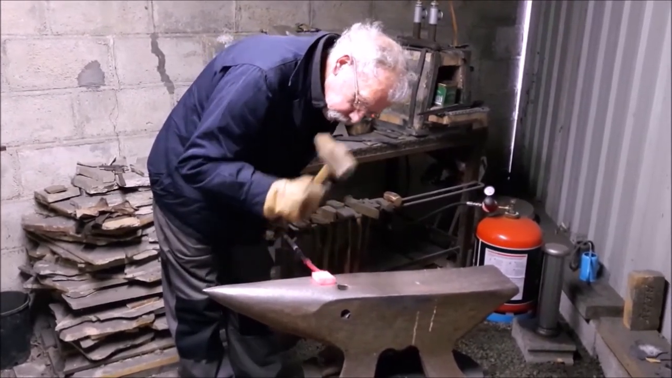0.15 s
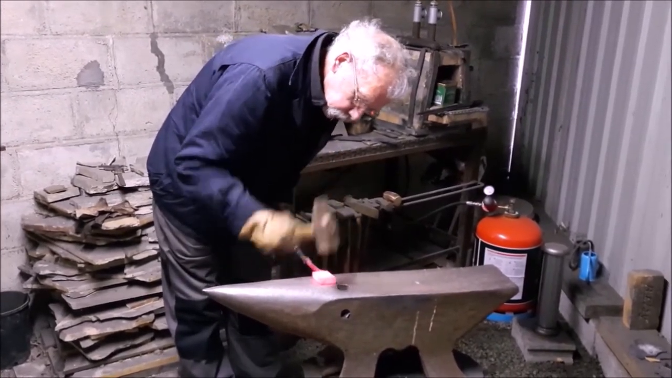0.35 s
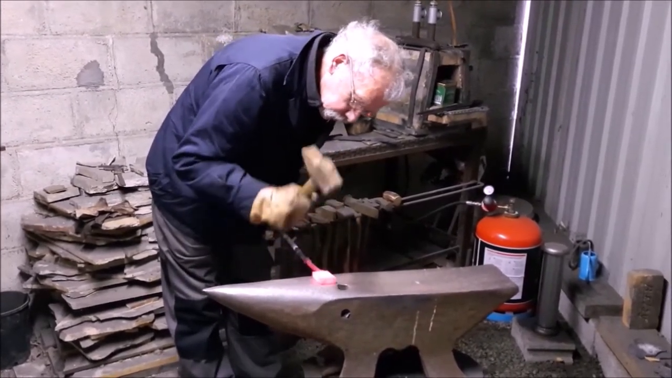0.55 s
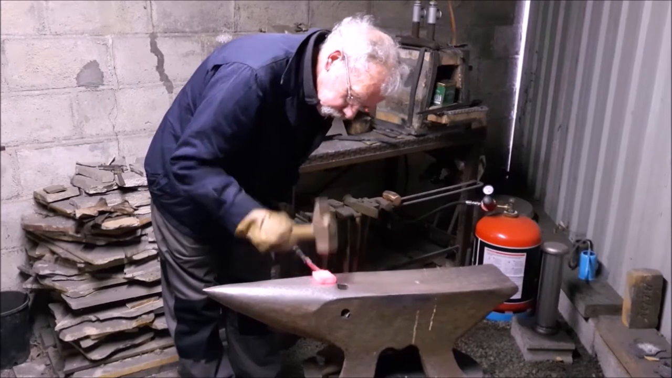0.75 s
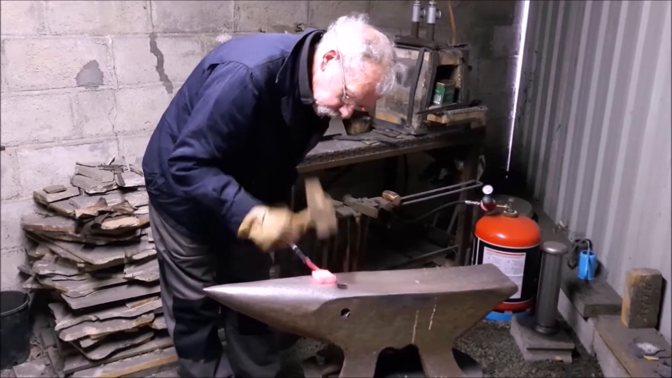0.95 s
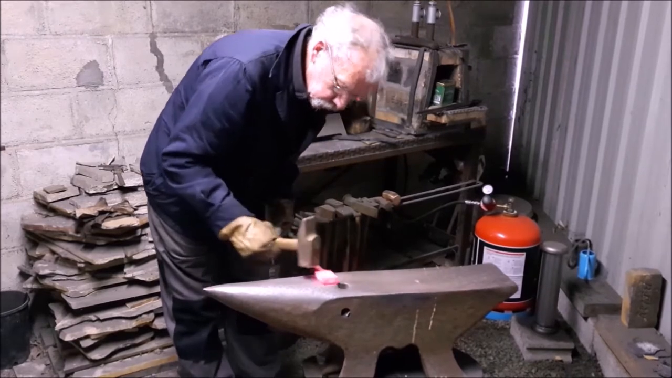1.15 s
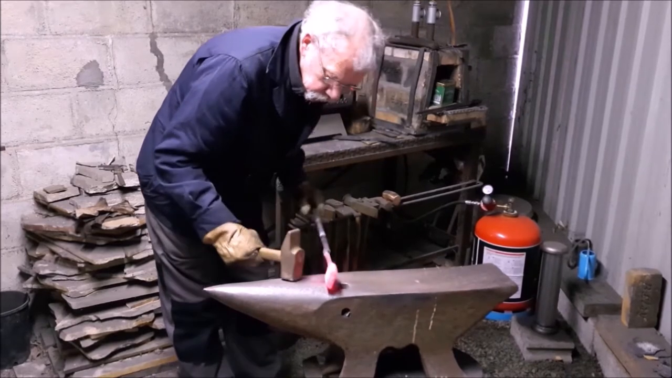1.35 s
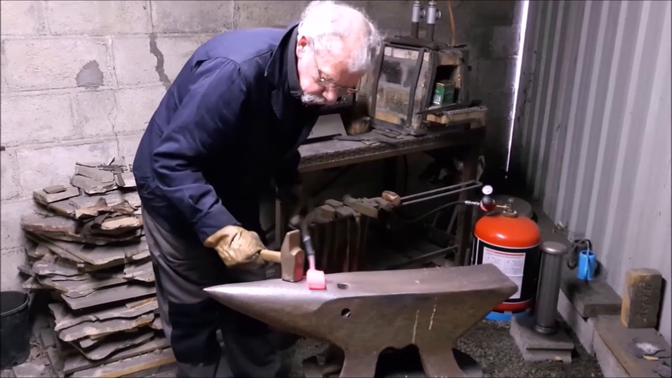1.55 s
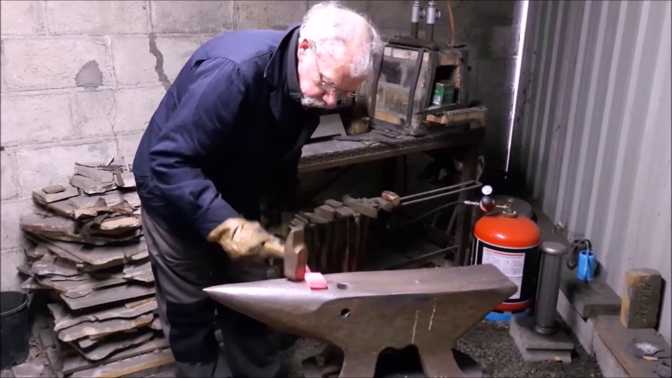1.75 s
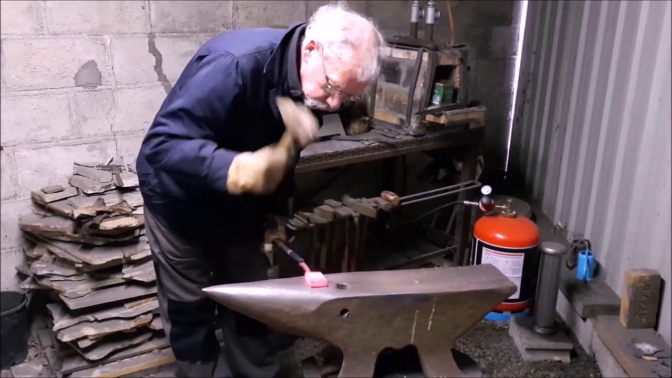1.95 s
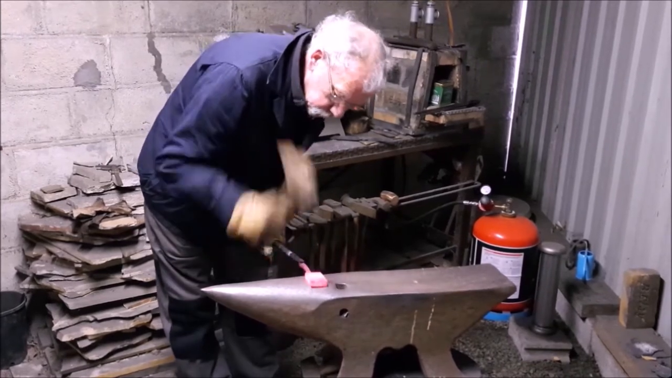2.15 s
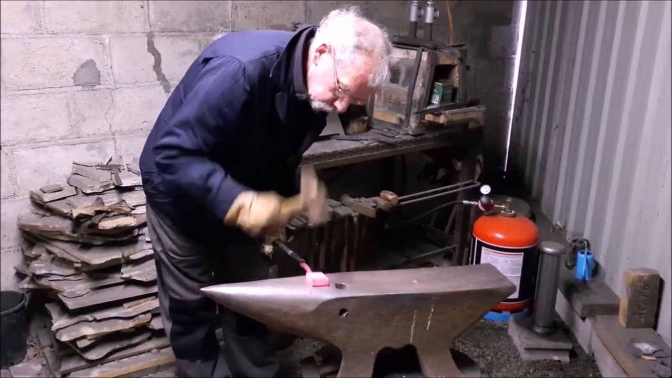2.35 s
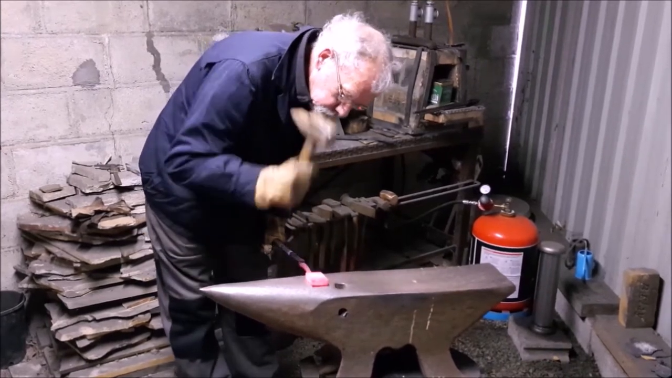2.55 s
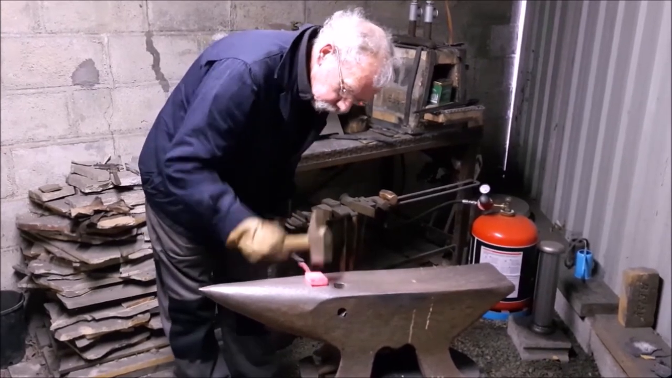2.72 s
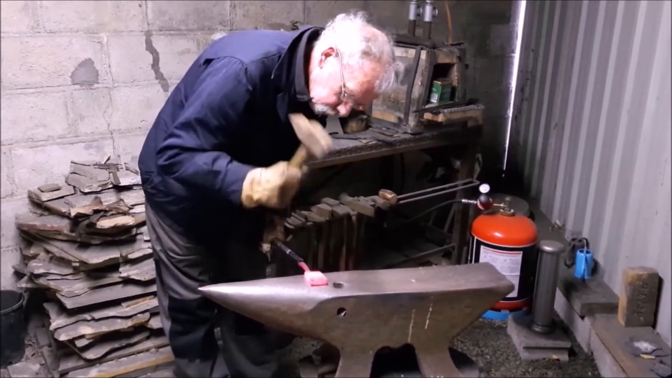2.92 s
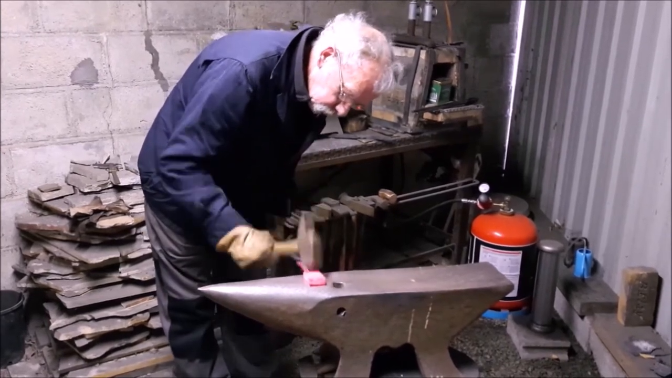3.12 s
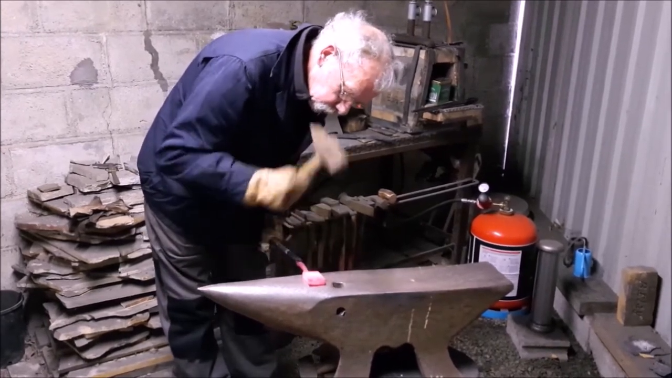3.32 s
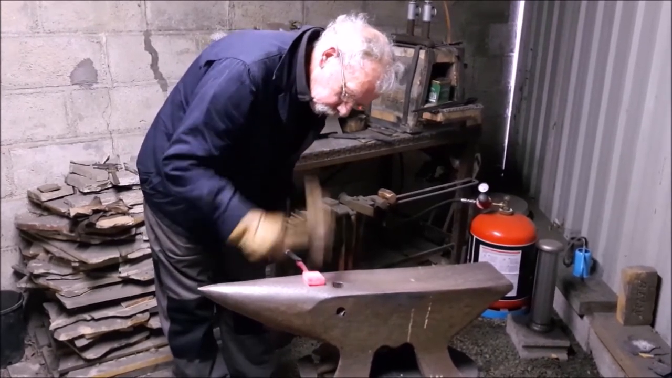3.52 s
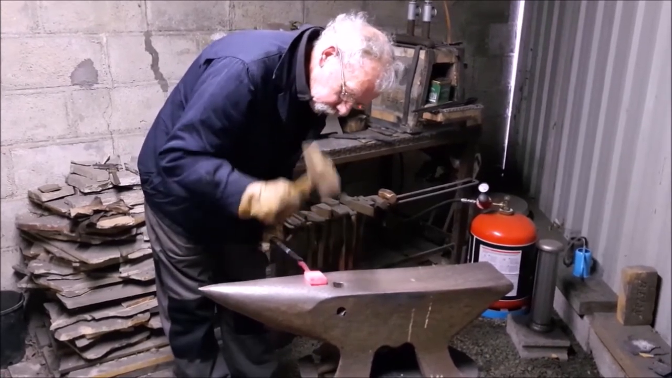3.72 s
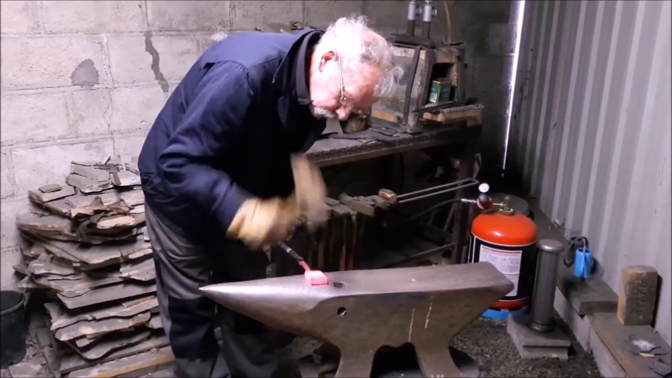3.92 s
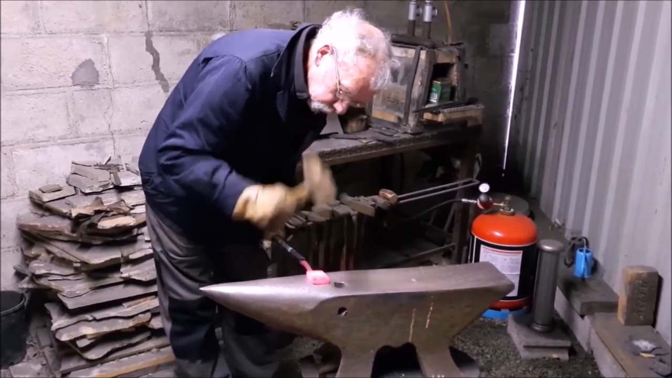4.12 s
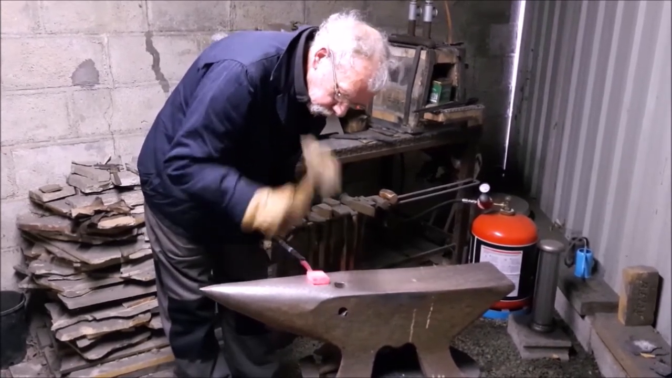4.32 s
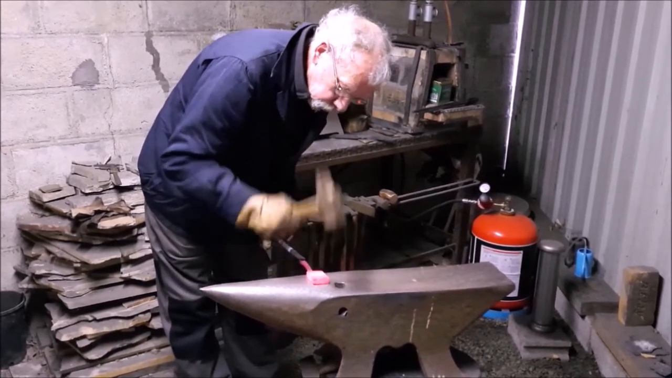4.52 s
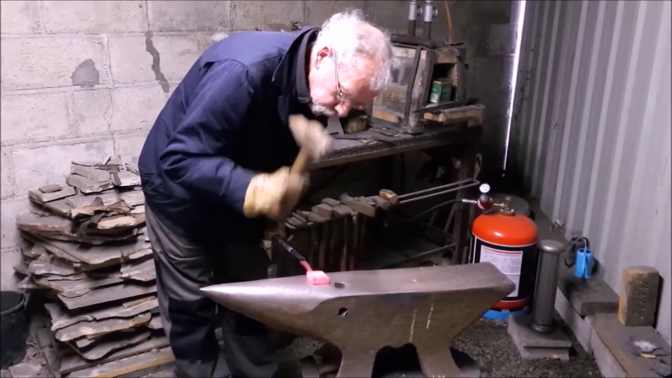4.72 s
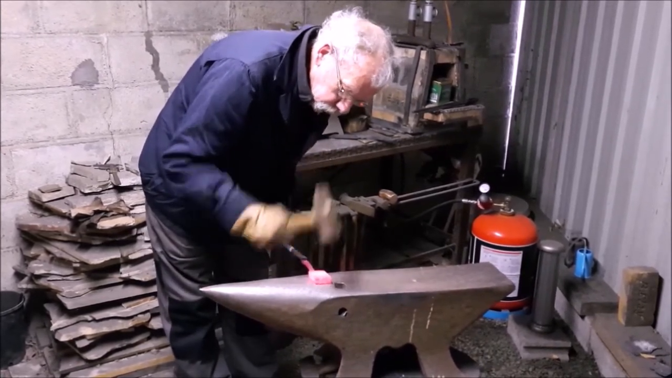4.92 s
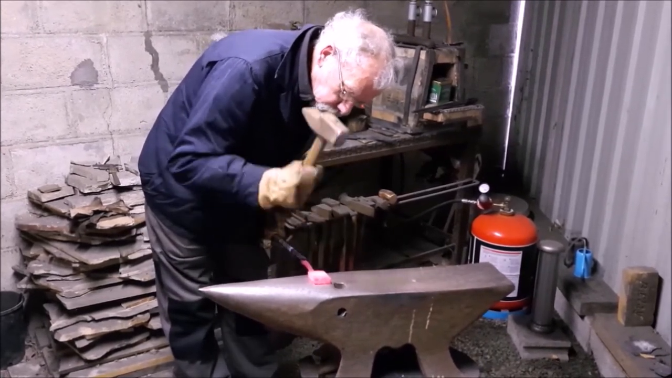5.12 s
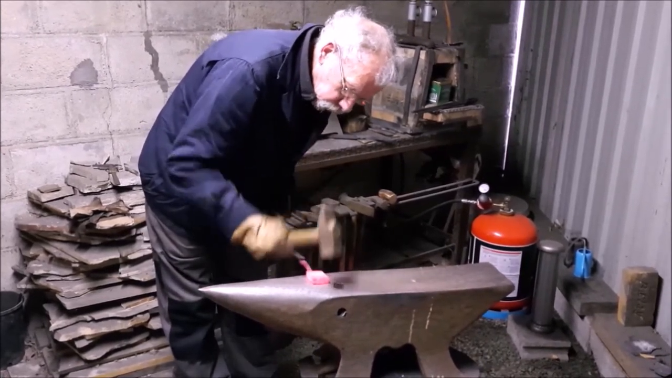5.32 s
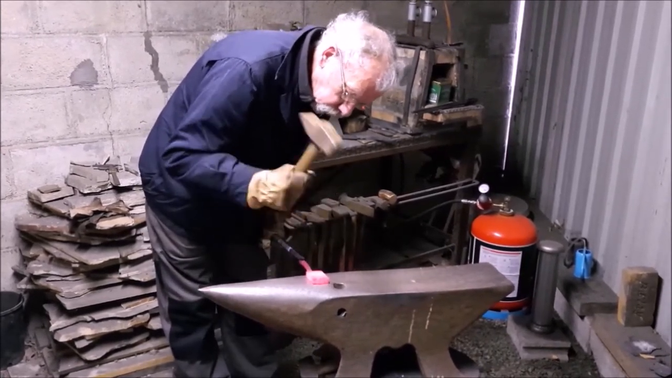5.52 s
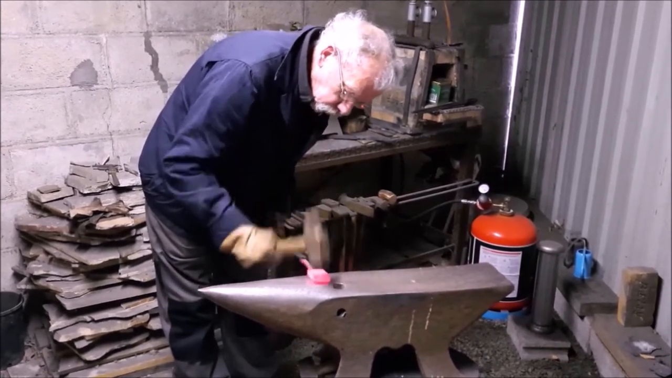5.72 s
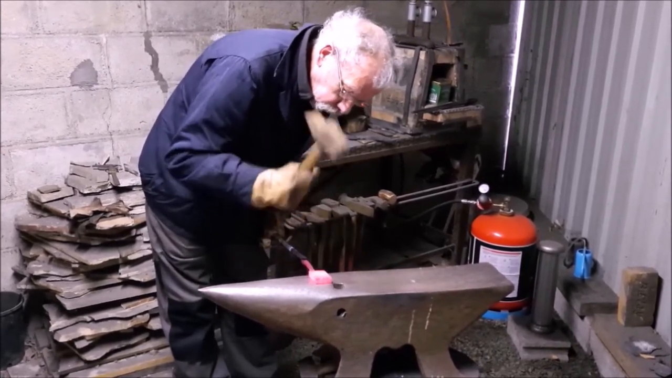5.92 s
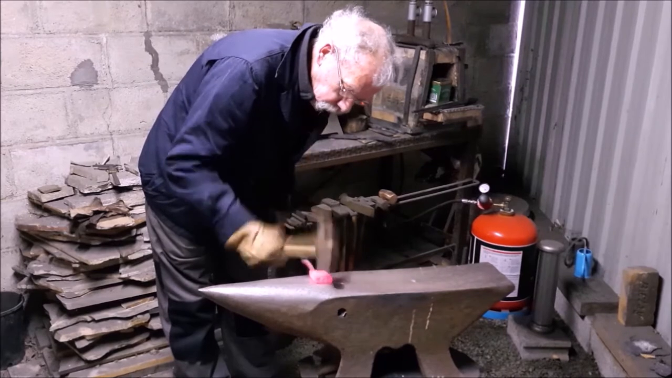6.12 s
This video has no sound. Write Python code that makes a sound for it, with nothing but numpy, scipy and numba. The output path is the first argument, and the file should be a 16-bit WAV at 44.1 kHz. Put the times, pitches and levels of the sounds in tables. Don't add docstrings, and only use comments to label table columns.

```python
import sys
import numpy as np
from scipy import signal
from scipy.fft import rfft, irfft
from scipy.io import wavfile
from scipy.ndimage import uniform_filter1d
from numba import njit

SR = 44100
rng = np.random.default_rng(int(sys.argv[2]) if len(sys.argv) > 2 else 0)


def generate_wav(sig):
    pcm = np.round(np.clip(np.atleast_2d(sig).T, -1, 1) * 32767).astype(np.int16)
    wavfile.write(sys.argv[1], SR, pcm)


def ratio(d):
    e = np.asarray(d, float) / 20
    return 10 ** e


N = 276507
THIRDS_HZ = 50 * 2 ** (np.arange(26) / 3)
TAP = 4


def on_log(hz, table, column=1):
    table = np.array(table)
    return np.interp(np.log(hz), np.log(table[:, 0]), table[:, column])


def filtered(x, kind, hz, order=2):
    return signal.sosfilt(signal.butter(order, hz, kind, fs=SR, output="sos"), x)


def band(hz, noise=None):
    noise = rng.standard_normal(N) if noise is None else noise
    return filtered(noise, "band", [hz / 2 ** (1 / 6), hz * 2 ** (1 / 6)])


def walk(rate):
    hold = int(SR / rate)
    steps = np.repeat(rng.standard_normal(N // hold + 1), hold)
    return 1.27 * uniform_filter1d(uniform_filter1d(steps, hold), hold)[:N]


def swell(times, sizes, t60, fill):
    kicks = np.zeros(N, dtype=np.asarray(sizes).dtype)
    kicks[(np.asarray(times) * SR).astype(int)] = sizes
    rise = np.exp(-1 / (max(fill, 1e-4) * SR))
    decay = np.exp(-np.log(1000) / (t60 * SR))
    return signal.lfilter([1 - rise], np.convolve([1, -rise], [1, -decay]), kicks)


@njit
def ring(starts, sizes, pole, fill, waver, survives):
    out = np.zeros(waver.shape[1])
    for m in range(len(pole)):
        turn = pole[m] / abs(pole[m]) * fill
        z, feed, k = 0j, 0j, 0
        for i in range(len(out)):
            if k < len(starts) and i == starts[k]:
                z *= survives[k]
                feed += sizes[m, k]
                k += 1
            z = z * pole[m] + (1 - fill) * feed + 1e-18
            feed = feed * turn + 1e-18
            out[i] += z.real * waver[m % len(waver), i]
    return out


def poles(hz, t60):
    return np.exp((2j * np.pi * hz - np.log(1000) / t60) / SR)


# [start_s, crack_db, along_face_cm, across_face_cm, tilt_degrees]
FIRST_BLOW = [(0.0, -8, 2.9, 1.13, -0.76)]
# [start_s, crack_db, along_face_cm, across_face_cm, tilt_degrees]
LATER_BLOWS = [(0.413, -9.5, -1, 3, -0.9), (0.803, -8, -0.4, -1.5, 1.4), (1.147, -11, 1.2, -3, -1),
               (2.369, -6, 0.73, -1.72, 3.86), (2.834, -6.5, -3.5, 3.5, -0.75),
               (3.268, -7.5, -0.04, -3.5, -0.87), (3.707, -7.0, -3, -3, -1.14), (4.132, -5.5, 1.94, 3.5, 4),
               (4.557, -8.5, 1.42, 3, 1.7), (4.995, -8, -2.5, -1.2, -2.5), (5.424, -9.5, 0.03, 2.5, -1.17),
               (5.861, -8.5, 1.72, -1.37, -0.51)]


def hammer_blows():
    return np.array(list(FIRST_BLOW) + list(LATER_BLOWS))


def at_spot(waves):
    spots, waves = hammer_blows()[:, 2:], np.array(waves)
    half_waves = spots @ waves[:, :3].T + waves[:, 3]
    node_floor = 0.01
    return waves[:, 4] + 10 * np.log10(np.cos(np.pi * half_waves) ** 2 + node_floor)


def touched(rows):
    rows = np.array(rows)
    return np.column_stack([rows, -18 + 0.65 * rows[:, 4]])


# [half_waves_per_cm_along, half_waves_per_cm_across, half_waves_per_degree, offset_half_waves, crest_db]
CRACK_WAVES = [(0.037, 0.036, -0.0, 0.14, -22.5), (-0.063, -0.014, -0.03, -0.084, -6.5),
               (0.14, -0.17, -0.14, 0.099, -7.5), (0.12, -0.02, -0.1, -0.042, -12.5)]
# [crack_db, thud_share_db, share_1_to_3_khz_db, share_6_to_11_khz_db]
LIGHT_TAP = (-25, -27, -14, -24)


def struck():
    tap_s = 1.403
    blows = np.hstack([hammer_blows()[:, :2], at_spot(CRACK_WAVES)])
    return np.insert(blows, TAP, touched([(tap_s, *LIGHT_TAP)])[0], axis=0)


def rugged():
    ruggedness_db, spacing_hz = 6, 45
    k = int(spacing_hz * N / SR)
    peaks = uniform_filter1d(uniform_filter1d(rng.standard_normal(N // 2 + 1), k), k)
    depth = np.clip(np.arange(N // 2 + 1) * SR / N / 2000, .2, 1)
    spectrum = rfft(rng.standard_normal(N))
    noise = irfft(spectrum * ratio(ruggedness_db * depth * peaks / peaks.std()), N)
    return noise / noise.std()


# [start_s, crack_db, thud_share_db, share_1_to_3_khz_db, share_6_to_11_khz_db]
TOUCHES = [
    (1.392, -34.5, -14, 6.5, -24),
    (1.44, -40, -12, -9, -22),
    (1.48, -36.5, -24, -2, -24),
    (1.525, -37, -10.5, -9, -36),
    (1.575, -35, -25, -5, -30),
    (1.633, -31.5, -52, -25, -6),
    (1.70, -39.5, -34, -6, -19),
    (1.765, -41, -30, -12, -19),
]
# [pitch_hz, level_db_per_hz]
CRACK_COLOUR = [(50, -6), (120, -5), (300, -6), (900, -13), (1500, -8.5), (2000, -12.5), (2500, -17),
                (3200, -9.5), (4700, -14.5), (6500, -11.5), (10900, -14), (15000, -9.5), (16500, -16.5)]
# [pitch_hz, t60_s, fill_time_s]
SHED_ECHO = [(60, 0.9, 0.011), (260, 0.46, 0.0013), (630, 0.34, 0.0071), (1790, 0.35, 0.0015),
             (4780, 0.31, 0.003), (12900, 0.24, 0.0049)]
# [delay_s, level_db]
ECHOES = [
    (0, -16),
    (.0045, -6.5),
    (.009, -18),
    (.014, -8.5),
    (.021, -6),
]


def cracks():
    contacts = np.vstack([struck(), touched(TOUCHES)])
    s, db = contacts[:, 0], contacts[:, 1]
    corners = np.log([250, 600, 1800, 4500, 8000, 13000])
    noises = (rugged(), rugged())
    out = 0
    for k, hz in enumerate(THIRDS_HZ):
        share = np.array([np.interp(np.log(hz), corners, [thud + 21, 0, mid + 9, 0, high + 10, top + 13])
                          for thud, mid, high, top in contacts[:, 2:]])
        size = ratio(db + share + on_log(hz, CRACK_COLOUR) + 1.25 * rng.standard_normal(len(s)))
        t60 = on_log(hz, SHED_ECHO)
        wash = swell(s, size, t60, on_log(hz, SHED_ECHO, 2))
        burst = ratio(-3.0) * swell(s, size, 0.041 + 6 / hz, 0)
        late = ratio(-27.5) * swell(s, size, 1.93 * t60, 0.0051)
        ahead = ratio(-16) * (hz > 800) * swell(N / SR - s[1:], size[1:], .012, 0)[::-1]
        flicker = ratio(2 * walk(40))
        out = out + band(hz, noises[k % 2]) * (burst + wash + late + ahead) * flicker
    clicks = 0
    for lag, echo_db in ECHOES:
        size = ratio(db + 3.6 * rng.standard_normal(len(s)))
        clicks = clicks - ratio(echo_db) * swell(s + lag, size, 0.0014, 0)
    return ratio(5.5) * out + ratio(8.0) * filtered(clicks, "high", 900)


# [pitch_hz, level_db, t60_s]
STAND = [(67.5, -4.5, 0.2), (117, -3.5, 0.089), (241, -2.5, 0.094), (331, -0.5, 0.072)]


def stand():
    blows = struck()
    hz, db, t60 = np.transpose(STAND)
    chance = rng.standard_normal((len(blows), 2, len(hz))).transpose(1, 2, 0)
    thud_db = db[:, None] + blows[:, 1] + blows[:, 2] + 5.0 + 2.0 * chance[0]
    sizes = ratio(thud_db) * np.exp(1j * chance[1])
    starts = (blows[:, 0] * SR).astype(int)
    fill = np.exp(-1 / (0.0025 * SR))
    return ring(starts, sizes, poles(hz, t60), fill, np.ones((1, N)), np.ones(len(blows)))


# [half_waves_per_cm_along, half_waves_per_cm_across, half_waves_per_degree, offset_half_waves, crest_db]
FAMILY_WAVES = [(-0.084, -0.013, -0.078, -0.032, 4.5), (-0.267, -0.19, -0.022, -0.3, 5.5),
                (0.086, 0.052, 0.13, -0.15, 0.8), (0.066, -0.19, -0.11, -0.324, 0.4),
                (0.084, -0.177, 0.022, 0.018, 13), (0.046, 0.2, -0.096, -0.019, 6.5),
                (0.041, -0.0089, 0.041, 0.49, 14), (-0.213, 0.126, -0.16, -0.182, 10.5),
                (0.029, -0.086, -0.24, 0.38, 7.5), (0.055, -0.232, -0.16, 0.55, 1.5),
                (0.23, -0.17, 0.032, -0.045, 14.5), (0.066, 0.22, -0.26, -0.04, 6),
                (-0.039, 0.15, 0.041, 0.25, 0.4), (0.12, 0.13, 0.16, -0.029, 1.9),
                (0.25, -0.0029, -0.043, -0.51, 4), (-0.11, 0.23, 0.16, -0.47, 11),
                (0.16, 0.087, 0.173, -0.093, 8.5), (-0.104, 0.174, 0.081, 0.417, 13),
                (0.081, 0.105, -0.194, 0.355, 0)]
TAP_FAMILY_DB = [6, -18, -8, -10, -4.5, -2.5, -31, -16, -23, -20, -8, -35, -18, -6.5, -30, -16, -25, -25,
                 -37]


def families():
    force_db = hammer_blows()[:, 1:2] + 7.5
    ring_follow = 0.27
    return np.insert(at_spot(FAMILY_WAVES) + ring_follow * force_db, TAP, TAP_FAMILY_DB, axis=0)


# [level_db, t60_s]
ANVIL = [(-27, 0.45), (-25.5, 0.47), (-27.5, 0.48), (-25, 0.38), (-26, 0.38), (-26.5, 0.16), (-24, 0.26),
         (-27, 0.17), (-30, 0.36), (-42, 0.71), (-46.5, 0.55), (-33, 0.65), (-38.5, 0.57), (-43, 1.14),
         (-36, 0.87), (-37, 0.58), (-51, 0.68), (-46, 0.66), (-36.5, 1.46), (-27.5, 0.14), (-46, 1.19),
         (-37.5, 0.35), (-31, 0.34), (-50.5, 0.98), (-55, 0.7), (-49, 0.55), (-59, 1.0), (-48.5, 0.41),
         (-24.5, 0.5), (-25.5, 0.51)]
ANVIL_HZ = [1565, 2046, 2767, 3067, 3499, 3934, 3993, 4527, 4708, 5286, 5815, 6697, 7181, 7817, 8720, 9328,
            9512, 10260, 10561, 10840, 11191, 11340, 12320, 12660, 13075, 13510, 13750, 14090, 14350, 14868]
FAMILY = [0, 1, 2, 3, 12, 4, 13, 12, 5, 12, 5, 6, 14, 14, 7, 8, 8, 15, 9, 15, 10, 15, 16, 16, 17, 17, 9, 17,
          11, 18]
# [pitch_hz, level_db, t60_s]
SWARM = [(884, -40, 0.42), (1900, -39, 0.41), (2300, -51, 0.25), (2900, -39, 0.31), (4600, -42, 0.3),
         (7000, -44, 0.32), (11000, -39, 0.37), (16000, -45, 0.4)]
# [start_s, level_under_tap_db]
BOUNCES = [
    (1.44, -12),
    (1.48, -10),
    (1.525, -11),
    (1.61, -12),
]


def anvil(count=100):
    blows = struck()
    bounce_s, bounce_db = np.transpose(BOUNCES)
    rows = np.append(np.arange(len(blows)), [TAP] * len(BOUNCES))
    s = np.append(blows[:, 0], bounce_s)
    soft_db = np.append(0 * blows[:, 0], bounce_db)
    mode_hz = np.array(ANVIL_HZ)
    mode_db, mode_t60 = np.transpose(ANVIL)
    lesser_hz = np.sort(1300 + 14400 * rng.random(count) ** 1.4)
    twin_hz = mode_hz - 13.68 * (1 + .3 * rng.standard_normal(len(mode_hz)))
    hz = np.concatenate([mode_hz, twin_hz, lesser_hz])
    twin_t60 = 1.13 * np.minimum(mode_t60, .6)
    lesser_t60 = on_log(lesser_hz, SWARM, 2) * (0.56 + 1.0 * rng.random(count) ** 2)
    t60 = np.concatenate([mode_t60, twin_t60, lesser_t60])
    chance = rng.standard_normal((len(s), 2, len(hz))).transpose(1, 2, 0)

    strong_db = mode_db[:, None] + families()[rows][:, FAMILY].T
    strong_db = strong_db - 3 * (mode_hz[:, None] > 12000)
    outer_twin = (twin_hz[:, None] > 5000) | (twin_hz[:, None] < 2300)
    twin_db = strong_db - 6 - 8 * outer_twin + 2.2 * chance[0, :len(mode_hz)]
    bright_db = (lesser_hz[:, None] > 11000) * (blows[rows, 5] + 12)
    lesser_db = (on_log(lesser_hz, SWARM) + 7)[:, None] + blows[rows, 1] + bright_db
    lesser_db = lesser_db + 2.66 * chance[0, -count:]
    sizes = ratio(np.vstack([strong_db, twin_db, lesser_db]) + soft_db) * np.exp(3j * chance[1])

    order = np.argsort(s)
    survives = np.where((soft_db < 0) | (rows == TAP), 1., .35)
    waver = ratio([1.9 * walk(22.144) for _ in range(7)])
    fill = np.exp(-1 / (0.019 * SR))
    starts = (s[order] * SR).astype(int)
    out = ring(starts, sizes[:, order].copy(), poles(hz, t60), fill, waver, survives[order])
    t = np.arange(N) / SR
    laid_s, lifted_s, still_db_per_s = 1.57, 2.362, -33
    return out * ratio(-1.63 + still_db_per_s * (t - laid_s).clip(0) * (t < lifted_s))


# [pitch_hz, level_db_rms]
HUM = [(102.3, -38.5), (199.2, -50), (274.5, -59), (301.5, -47.5), (398.4, -58.5), (500.6, -68),
       (624.5, -80), (899.0, -72), (1448, -78), (1696, -70)]


def welder_hum():
    t = np.arange(N) / SR
    hum = 0
    for hz, db in HUM:
        near_multiple = abs(hz / 100 - round(hz / 100)) < .04
        exact = 100.1 * round(hz / 100) if near_multiple else hz
        phase = 2 * np.pi * exact * t + 0.0025 * exact * walk(5.1) + 6 * rng.random()
        level = ratio(db + 1.1 * walk(5.17) * min(hz / 300, 1))
        hum = hum + np.sqrt(2) * level * np.sin(phase)
    return hum


# [pitch_hz, level_db_per_hz]
AIR = [(25, -22), (60, -2.5), (110, -10.5), (200, -12.5), (300, -9.5), (450, -23.5), (700, -24.5),
       (1700, -31.5), (3200, -38.5), (4300, -57), (5300, -33), (8000, -42.5), (10000, -47.5),
       (15500, -40.5)]


def air_noise():
    air = sum(band(hz) * ratio(on_log(hz, AIR) + 1.8 * walk(16))
              for hz in np.append([25., 32., 40.], THIRDS_HZ))
    return air * ratio(-49.5) / air.std()


def slow_gain_db():
    s = hammer_blows()[:, 0]
    open_db, duck_db, earlier_blows, recover_t60_s, duck_s = -35.5, -1.91, 3.9, 10.5, 0.115
    earlier = earlier_blows * ratio(-60 * np.arange(N) / SR / recover_t60_s)
    return open_db + duck_db * (earlier + swell(s[1:], 1 + 0 * s[1:], recover_t60_s, duck_s))


# [start_s, level_over_low_noise_db]
JOLTS = [
    (1.066, 24),
    (4.405, 13),
    (5.44, 7),
]


def left_channel():
    jolt_s, jolt_db = np.transpose(JOLTS)
    shaken = ratio(3.7 * walk(9)) + swell(jolt_s, ratio(jolt_db), .16, .003)
    idle = filtered(rng.standard_normal(N), "band", [25, 130])
    return ratio(-70) * shaken * idle / idle.std()


def bar_knock():
    knock = filtered(rng.standard_normal(N), "band", [200, 1500])
    return knock * swell([1.062], [ratio(-23)], 0.018, 0.0012)


def scene():
    background = (welder_hum() + air_noise()) * ratio(38.5 + slow_gain_db())
    mic = 2 * (cracks() + stand() + anvil() + bar_knock() + background)
    return np.array([left_channel(), mic])


@njit
def limit(x, top, release):
    y, level = np.empty(len(x)), 0.
    for i in range(len(x)):
        level += (abs(x[i]) - level) * (.05 if abs(x[i]) > level else release)
        y[i] = x[i] * (min(1., top / (level + 1e-9))) ** .7
    return y


def mask(x, size=2048):
    mask_db, mask_hz, step_db, quiet_db = -8.5, 500, -28, -98
    hz, _, spec = signal.stft(x, SR, nperseg=size)
    power = abs(spec) ** 2 + 1e-14
    widths = (4 * 1.07 ** np.arange(90)).astype(int).clip(0, 16)
    edges = np.unique(widths.cumsum().clip(0, size // 2))
    which = np.searchsorted(edges, np.arange(len(hz)), "right").clip(1, len(edges)) - 1
    bands = (np.add.reduceat(power, edges) / np.bincount(which)[:, None])[which]
    around = uniform_filter1d(power, int(2 * mask_hz * size / SR), axis=0)
    floor = ratio(2 * quiet_db) * (hz[:, None] < 11500)
    strong_band = bands > around * ratio(2 * mask_db) + floor
    strong_line = power > bands * ratio(2 * step_db)
    keep = strong_band & strong_line | (hz[:, None] < 2200)
    total = power[hz > 1000].sum(0)
    sudden = total[1:] > 10 * total[:-1]
    keep[:, 1:] |= sudden
    keep[:, :-1] |= sudden
    keep &= hz[:, None] < 15850
    return signal.istft(spec * keep, SR, nperseg=size)[1][:N]


def top_cut(x):
    return signal.sosfilt(signal.butter(12, 16830, fs=SR, output="sos"), x)


def record(dry):
    ceiling_db, release_s = -7.5, 0.021
    right = np.tanh(limit(dry[1], ratio(ceiling_db), 1 / (release_s * SR)))
    top_edge = signal.ellip(4, .2, 30, 15900, fs=SR, output="sos")
    right = mask(signal.sosfilt(top_edge, right))
    return top_cut(np.array([dry[0], right]))


dry = scene()
out = record(dry)
generate_wav(out)
```